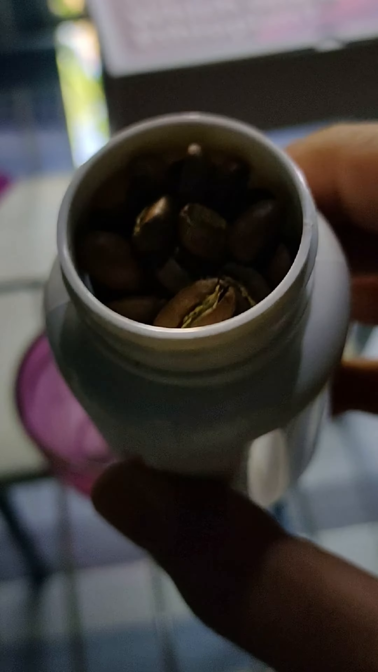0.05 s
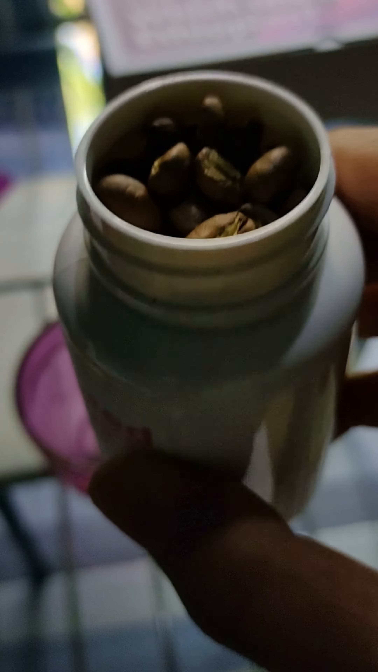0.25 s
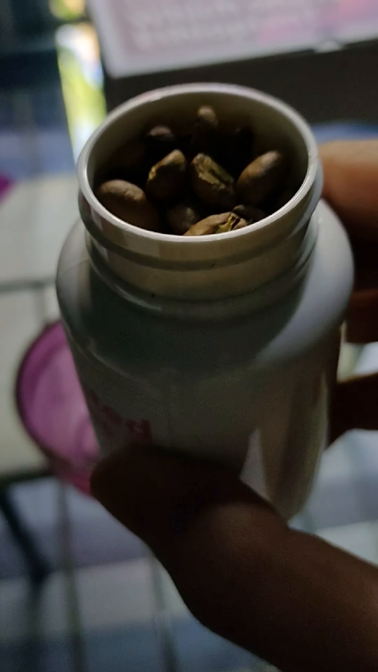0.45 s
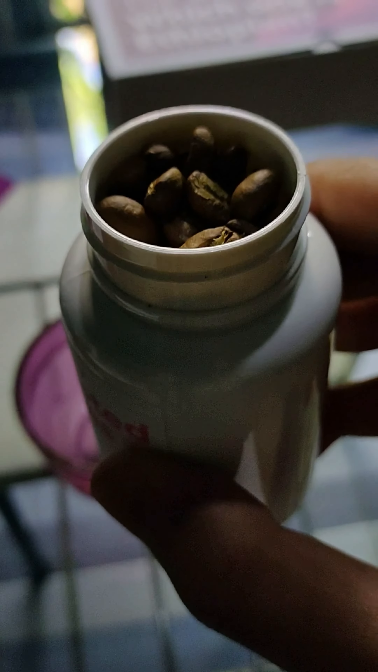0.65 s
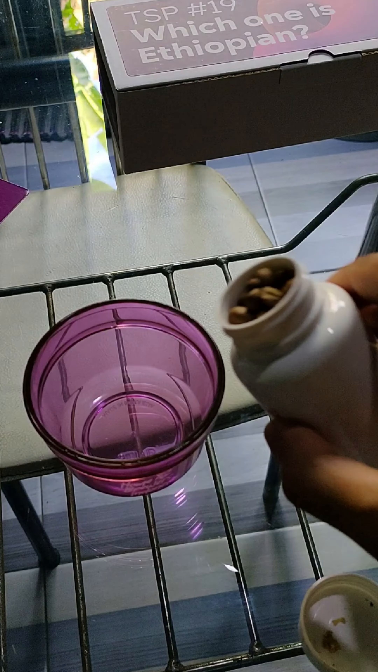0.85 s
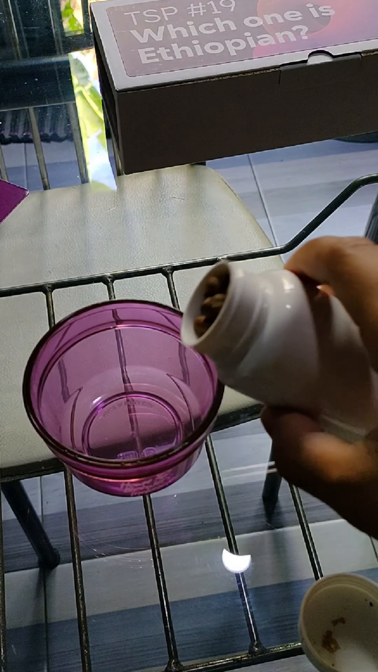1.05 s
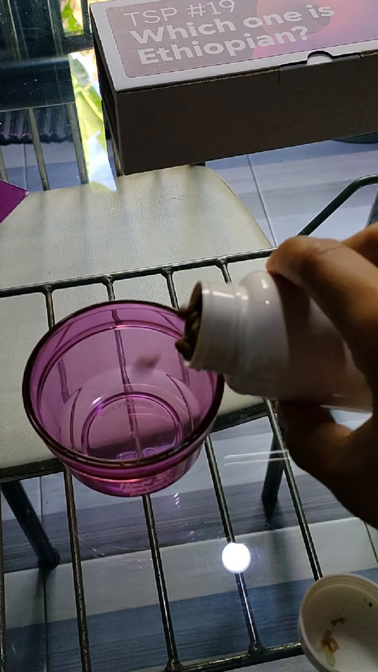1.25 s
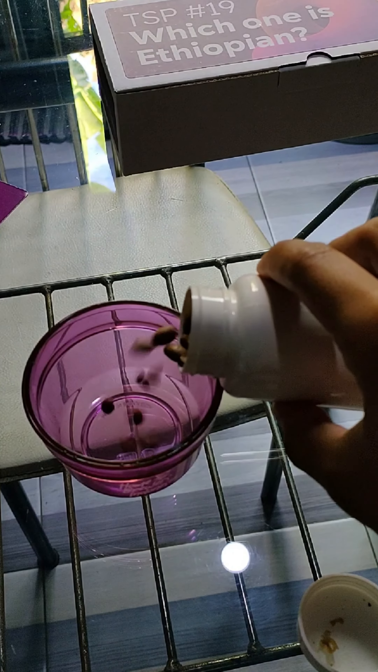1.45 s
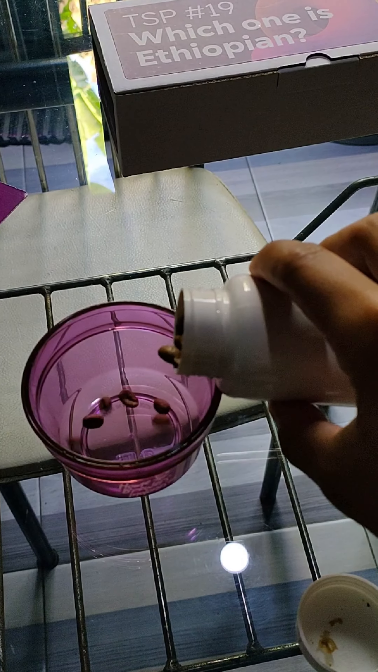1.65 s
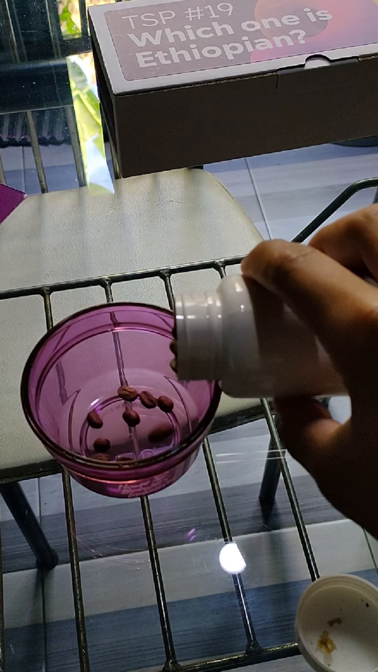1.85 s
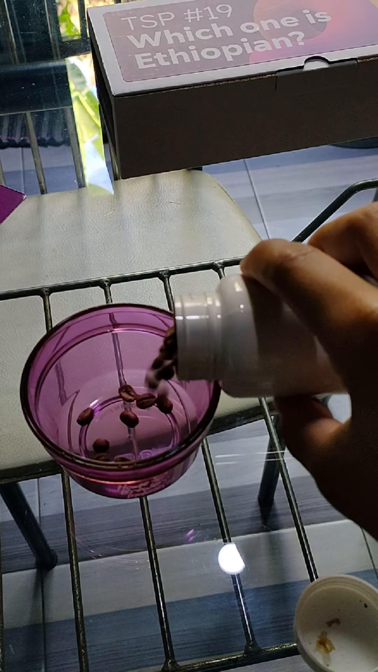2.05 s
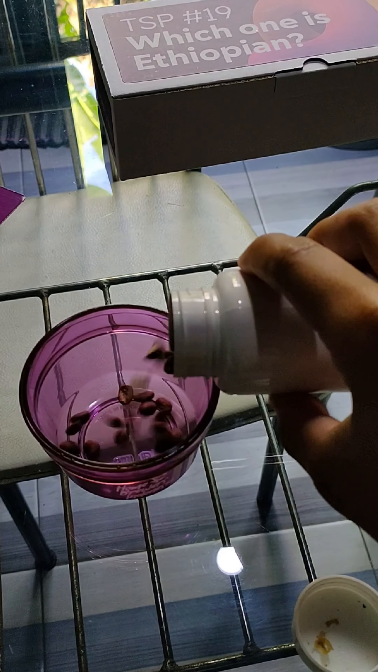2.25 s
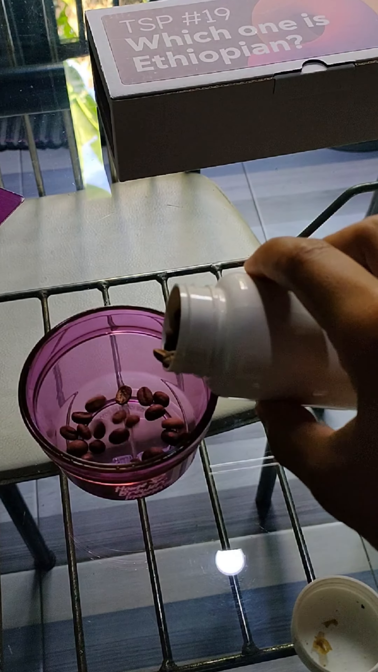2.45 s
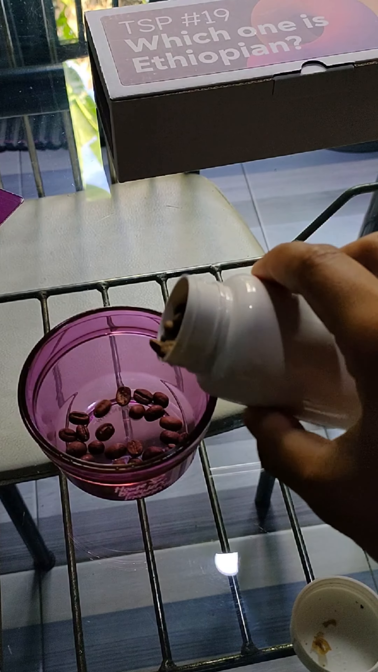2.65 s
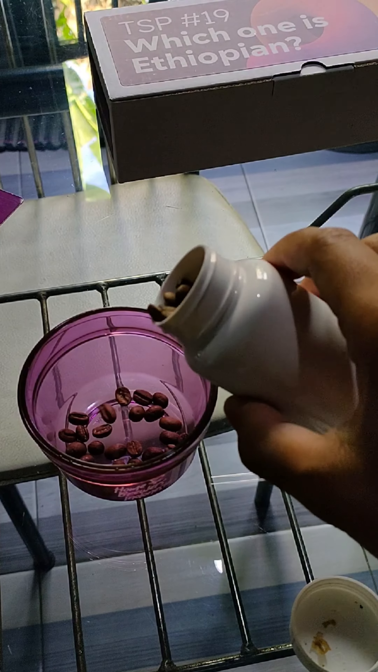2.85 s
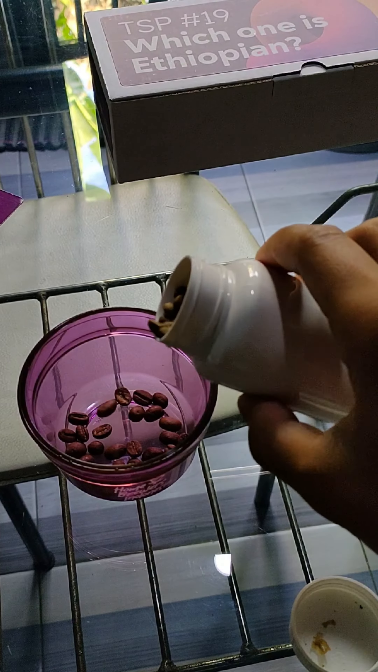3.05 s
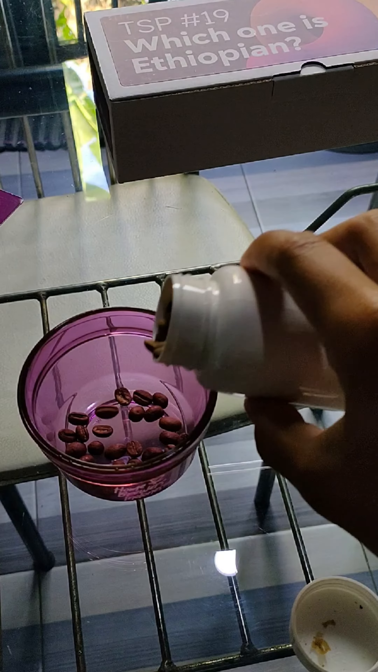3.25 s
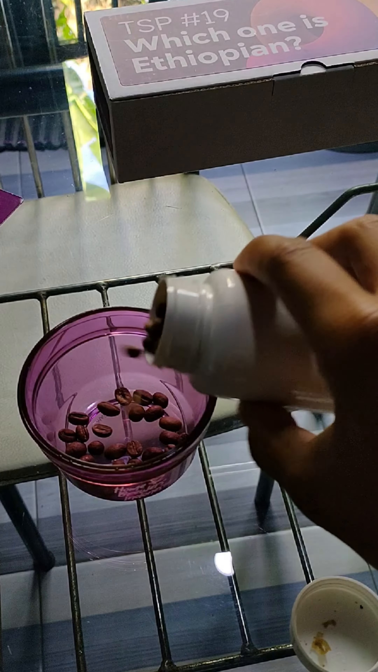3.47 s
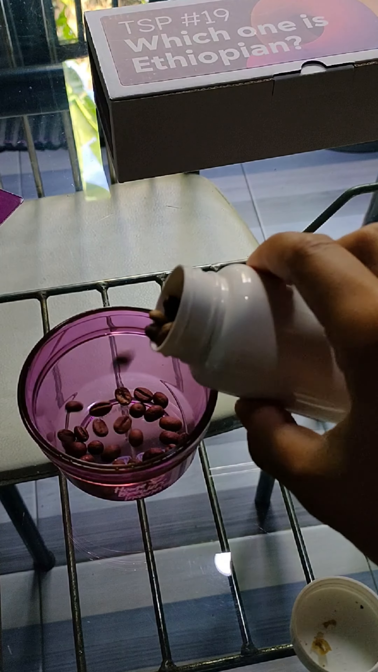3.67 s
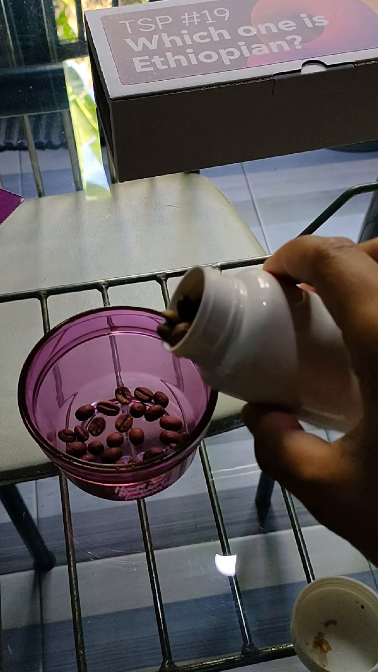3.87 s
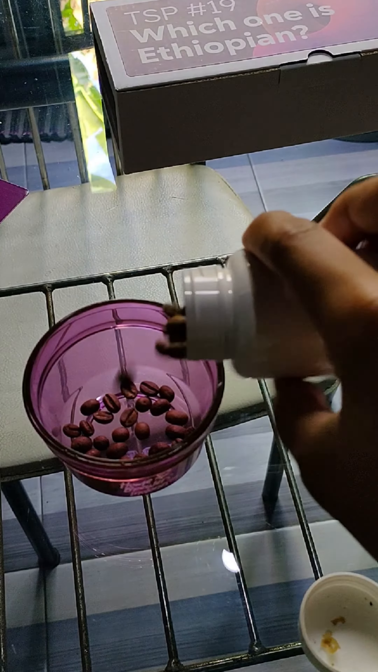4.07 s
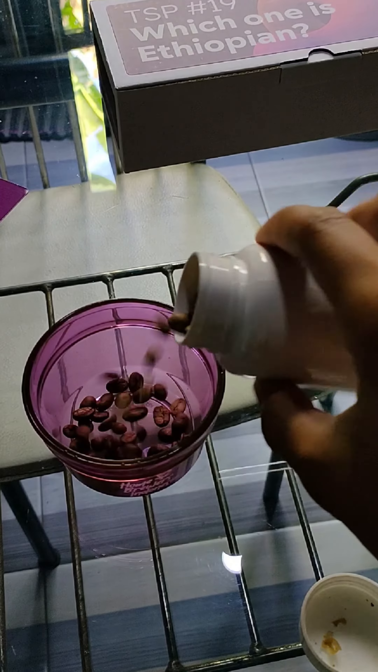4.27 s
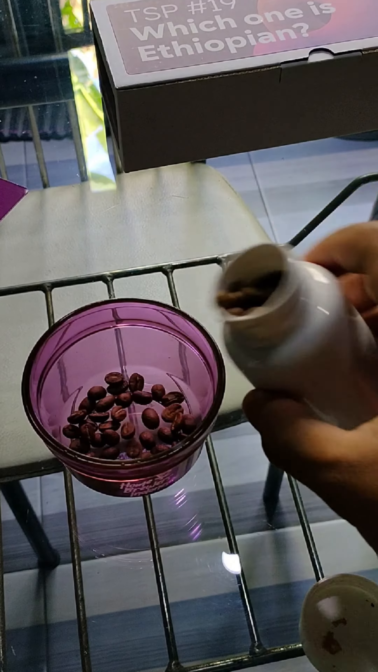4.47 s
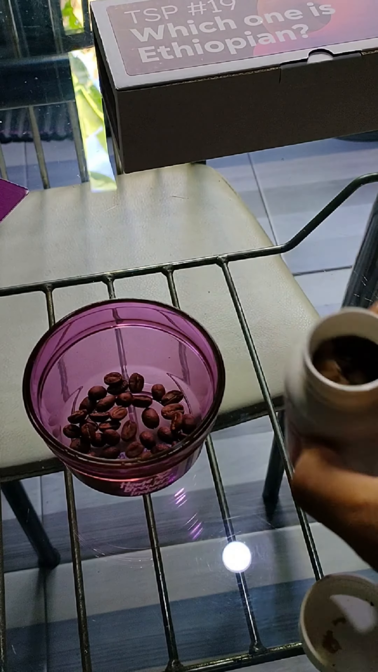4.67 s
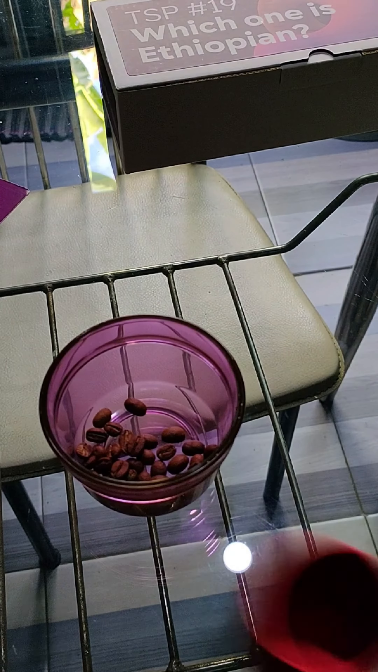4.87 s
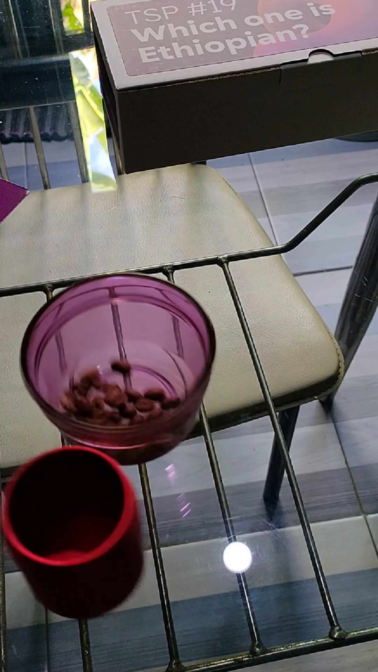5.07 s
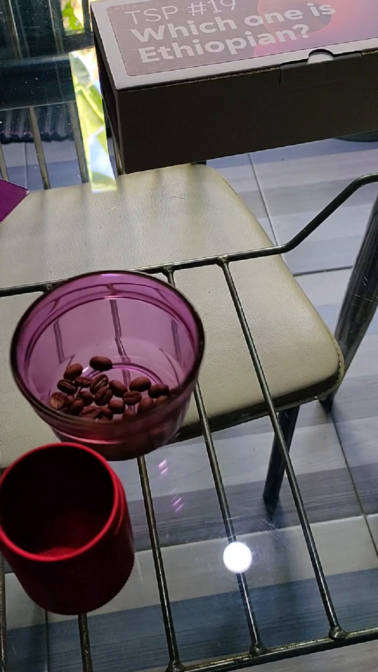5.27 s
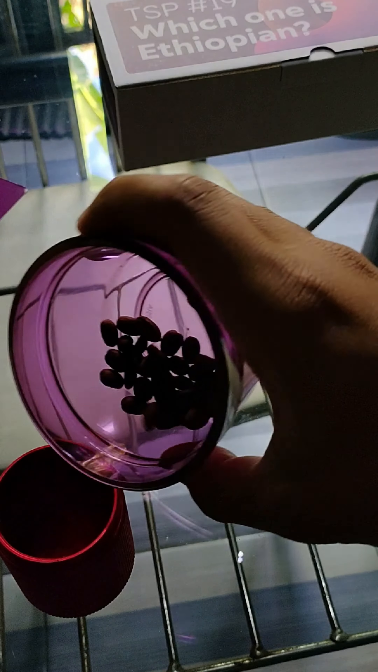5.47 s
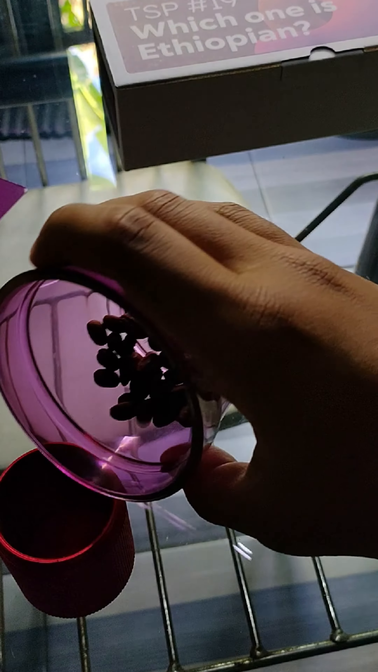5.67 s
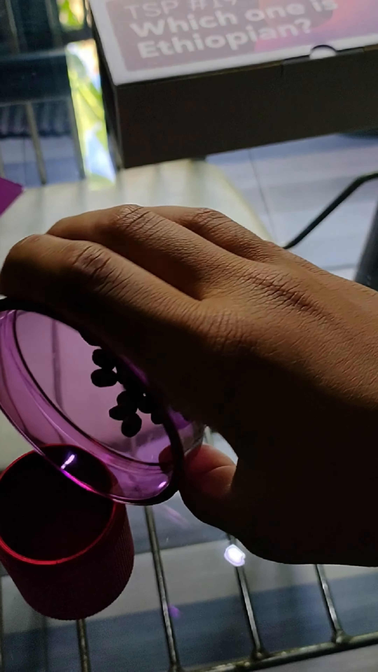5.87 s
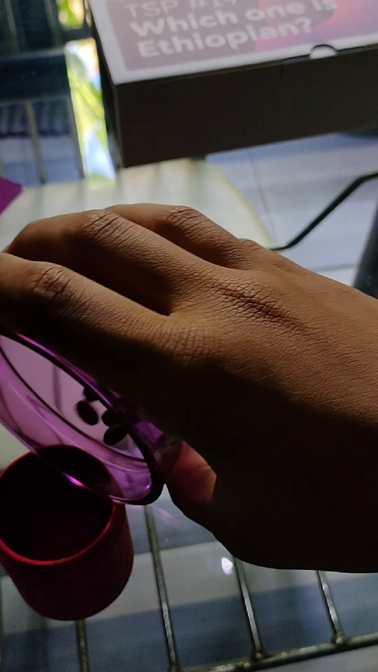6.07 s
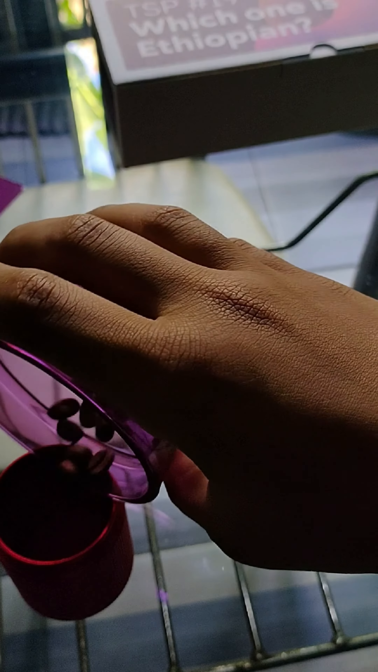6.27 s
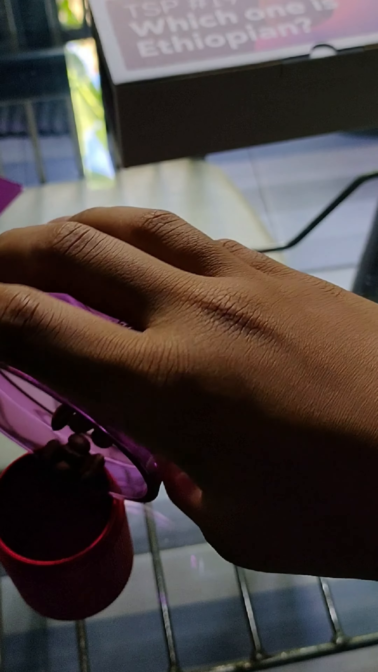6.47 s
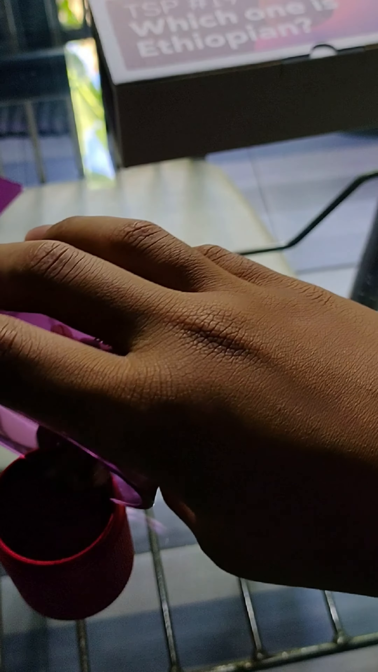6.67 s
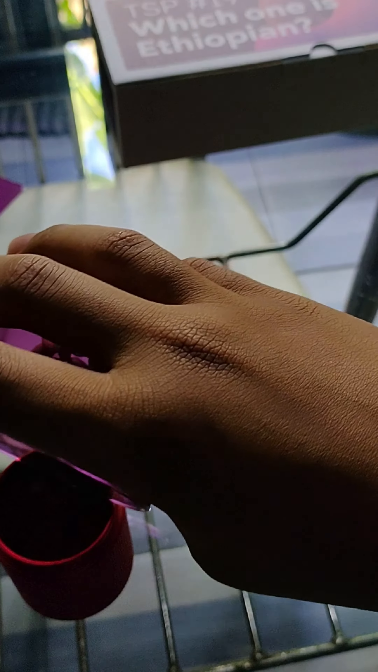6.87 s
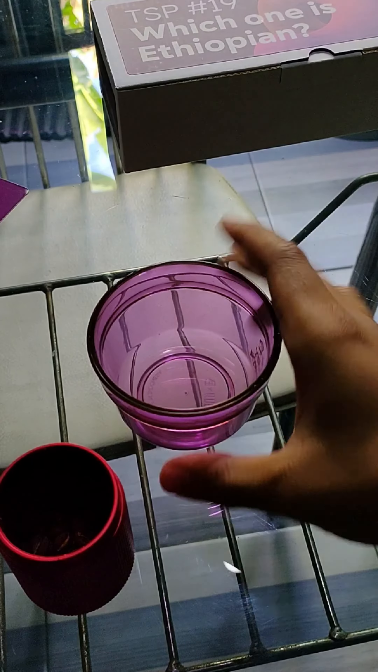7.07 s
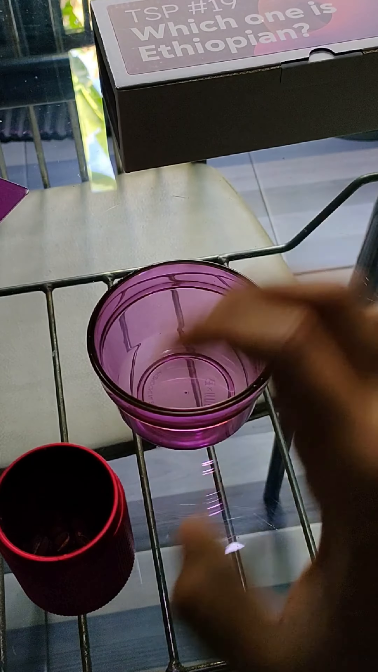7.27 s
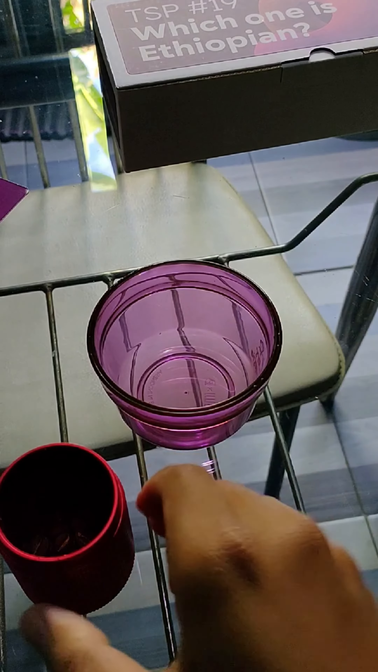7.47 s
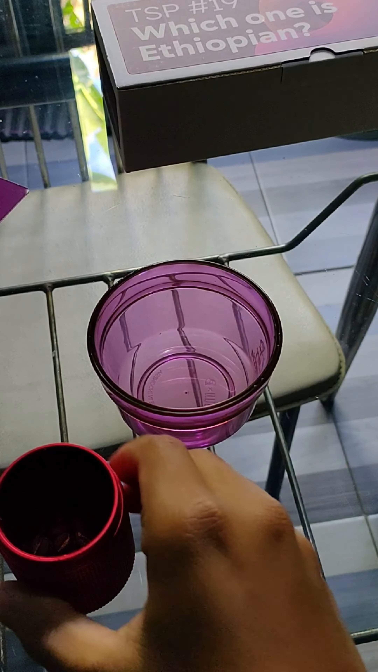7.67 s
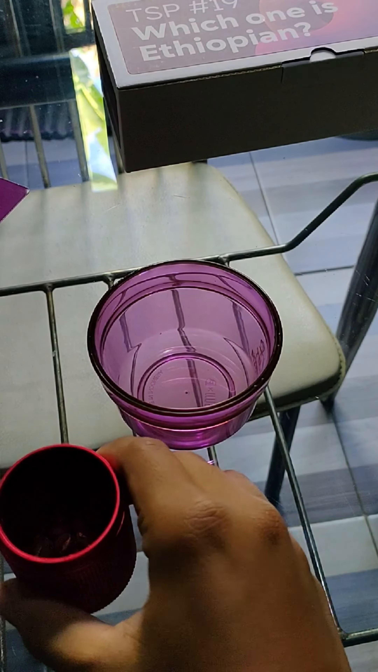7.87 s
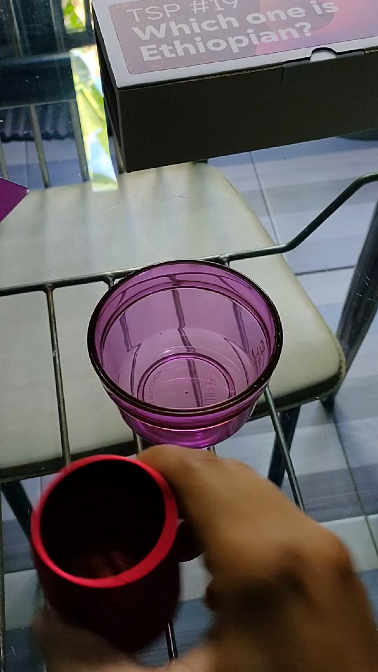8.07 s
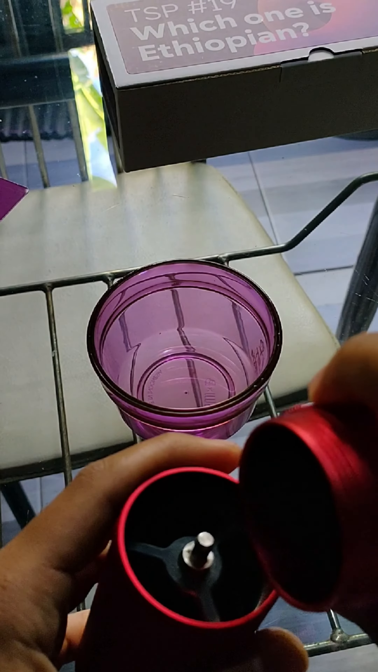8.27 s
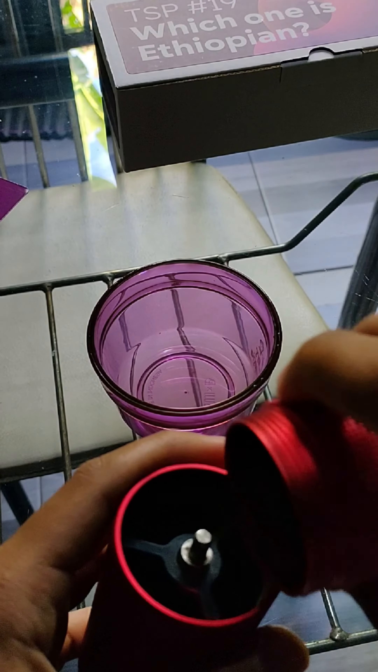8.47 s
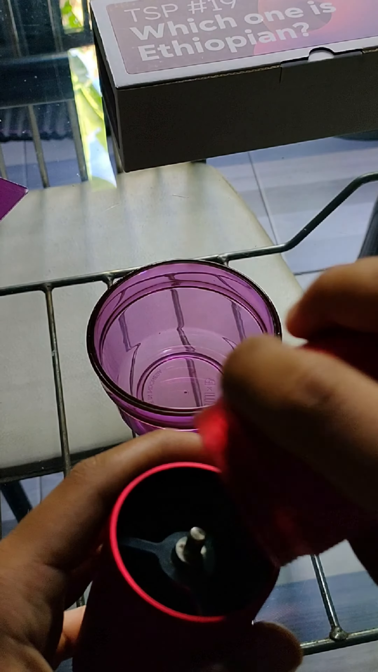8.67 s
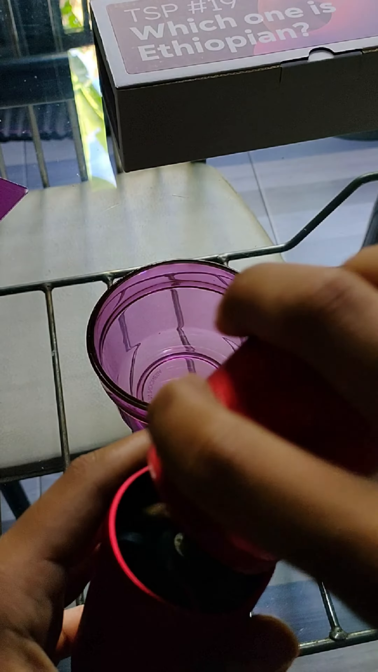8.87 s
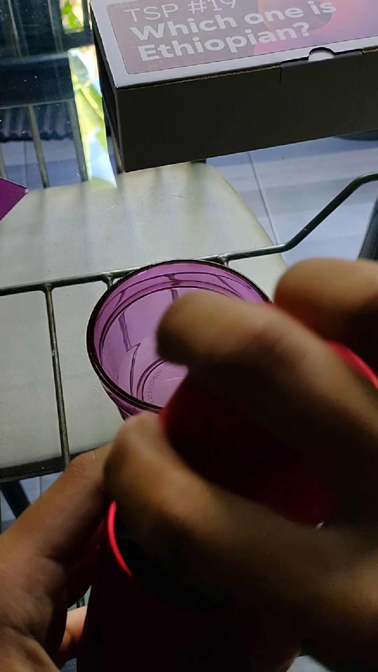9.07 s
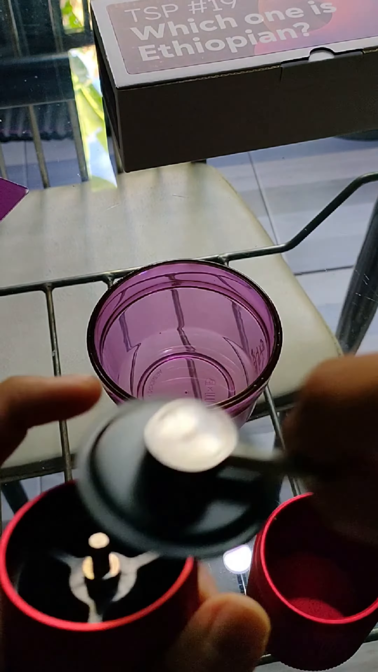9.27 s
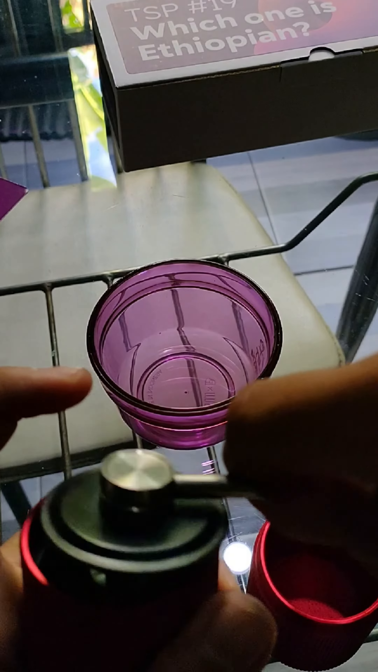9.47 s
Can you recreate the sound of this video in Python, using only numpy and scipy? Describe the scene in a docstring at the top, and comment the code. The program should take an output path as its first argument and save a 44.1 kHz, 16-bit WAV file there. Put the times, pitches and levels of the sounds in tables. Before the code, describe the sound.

Short pours of coffee beans clatter into plastic, a metal cup clanks on a wire rack, and softer pours follow.

```python
"""Coffee beans drop from a bottle into a plastic bowl on a wire rack, then slide into a metal cup
and a hand grinder. Each bean snaps and rings the vessel it hits, over the patter of the rest.
Vessels knock, clink and scrape on the rack, among faint rustles and ticks. Outside, a vehicle drones
past over street hum and hiss. The ringing and room tail break off abruptly four times, and the top
treble is missing."""
import sys
import numpy as np
from scipy import signal
from scipy.io import wavfile
from scipy.ndimage import uniform_filter1d

SR = 44100
rng = np.random.default_rng(int(sys.argv[2]) if len(sys.argv) > 2 else 0)


def dump(signal):
    """Clip the signal to [-1, 1] and save it as 16-bit WAV at the path in sys.argv[1]."""
    limited = np.clip(np.atleast_2d(signal).T, -1, 1)
    pcm = np.round(limited * 32767).astype(np.int16)
    wavfile.write(sys.argv[1], SR, pcm)


N = 419832

# start, the moments where ringing and room tail break off, and end: t/s
BREAKS = [0, 3.908, 4.775, 5.473, 6.938, 9.52]
# modes of the rack's wires: f/Hz, level/dB, t60/s
RACK_MODES = [(170, -12, 0.056), (242, -10, 0.068), (336, -14, 0.054), (407, -3.5, 0.039),
              (570, -8.5, 0.058), (703, -2, 0.035), (938, -1.5, 0.033), (1016, -6.5, 0.059),
              (1330, -2.5, 0.056), (1500, 2, 0.023), (1715, -3, 0.054), (1835, -5, 0.054)]


def beans_in_bowl():
    """Beans rattle into the plastic bowl, whose pitch creeps up as the heap stiffens its floor."""
    hits = [(1.3419, -20.5, 1, -5), (1.3918, -29, -2.5, -1), (1.4571, -32.5, -5, -8.5), (1.47, -36, 9, 9),
            (1.479, -23.5, -4, -4), (1.4909, -27.5, 5, -1), (1.511, -27.5, -7, -12), (1.5269, -29, -3, -4),
            (1.5517, -26, -12, -6.5), (1.5726, -38, -4, 6), (1.5949, -26, -6.5, -10),
            (1.6261, -36.5, -11, -9), (1.6667, -49, 3, 5), (1.7057, -40, -13.5, -12), (1.727, -47, -3, -13),
            (1.7487, -45, -8, -16), (1.8076, -45, -5, -4.5), (1.8793, -26, -1.5, -1.5),
            (1.9275, -37.5, -6.5, -3), (1.9649, -41, -7, -2), (2.014, -41.5, -5, -6.5),
            (2.1317, -29, -5, -4), (2.145, -27, 4, 0.5), (2.176, -29.5, -6.5, -9), (2.1887, -30, 2, -4),
            (2.2128, -25.5, -13.5, -9), (2.2422, -37, 7, -1), (2.2518, -29, 5, 0.5), (2.2634, -39, 9, -1),
            (2.2747, -26.5, 3.5, 0.5), (2.2903, -29, 3, -3), (2.3078, -19.5, -7, -11.5),
            (2.3351, -30, 8, 0), (2.346, -34, 6, -1), (2.3598, -28, -7, -6), (2.3765, -23, -6, -3),
            (2.3924, -30.5, -3, -12), (2.4137, -44, 0, -12), (2.4469, -26, -11, -16), (2.4686, -33, 3, 3),
            (2.4774, -33, 3, 4), (2.502, -47, 5, -0.5), (2.5192, -38, 2, -7), (2.5464, -36.5, 0.5, -5.5),
            (2.5598, -35, -7.5, -10), (2.574, -44, -4, -4.5), (2.5962, -40.5, -2, -9),
            (2.6067, -46, -2, -5), (2.6313, -44.5, -4.5, -6), (2.6443, -44.5, -7, -10),
            (3.5594, -28.5, -0.5, -7.5), (3.5947, -40, 3, -1.5), (3.642, -41, -5, -4),
            (3.6473, -29, -6.5, 1.5), (3.68, -41.5, -5, 10), (3.73, -48, -5, 12),
            (3.7648, -31.5, -10, -0.5), (3.7903, -41, -7, -6), (3.8454, -44.5, 1, 3),
            (3.8541, -36.5, -5, -8), (3.8653, -45, -14, -10), (3.8886, -45, -13, -10),
            (4.146, -33, 8.5, 11), (4.1824, -32.5, -4, -0.5), (4.1999, -33.5, 6, 7),
            (4.2243, -30, -1.5, -7), (4.2374, -45, 8, -5), (4.2619, -44, -5.5, -5), (4.2842, -35, 2.5, 3),
            (4.3176, -33, -0.5, -1), (4.3286, -29, 0.5, -4), (4.3634, -36.5, 3, 1), (4.375, -30.5, -4, -8),
            (4.3925, -40, -2, -7), (4.4014, -36, -3.5, -3), (4.4104, -43, -6, -15), (4.4197, -40.5, 4, 1),
            (4.4636, -41.5, 3, -12), (4.7092, -51, -10, 9)]  # loudest landings: t/s, level/dB, low modes/dB, high modes/dB
    modes = [(1322, -19.5, 0.024), (1556, -18, 0.024), (1809, -22, 0.093), (2241, -7.5, 0.12),
             (2378, -3.5, 0.034), (3220, -1.5, 0.13), (3312, -3.5, 0.11), (3400, 3.5, 0.015),
             (3970, -1.5, 0.016), (4250, -5, 0.018), (4566, -3.5, 0.047), (4932, -8.5, 0.038),
             (4900, 2.5, 0.023), (5617, 5.5, 0.01), (6000, -1, 0.036), (6456, -14.5, 0.028),
             (7046, -21, 0.012)]  # ring of the plastic: f/Hz, level/dB, t60/s
    pours = [
        [(1.36, -66), (1.5, -44.5), (1.62, -46.5), (1.8, -56.5), (2.1, -65), (2.25, -51), (2.45, -42.5),
         (2.67, -59), (2.9, -75.5)],
        [(3.57, -64), (3.75, -54.5), (3.905, -60)],
        [(4.16, -60), (4.21, -41.5), (4.33, -47.5), (4.42, -47), (4.5, -58.5), (4.72, -72)],
    ]  # patter envelopes, one a pour: t/s, level/dB
    loading = [(1.3, 0.999), (4.502, 1.0286)]  # stiffening under the heap: t/s, pitch factor
    return beans(hits, modes, pours, low_hz=2700, high_hz=4200, hold_s=0.007,
                 per_s=700, spread_db=1.5, patter_db=(-4, 3), loading=loading)


def beans_in_cup():
    """Beans slide into the metal cup with sparse, bright ticks."""
    hits = [(5.4759, -36, -14, -4.5), (5.5079, -42.5, -5, -8), (5.5474, -52, 5.5, 4),
            (5.6562, -42, -15, -6), (5.679, -37.5, -20, -7), (5.7074, -43, -19, -6.5),
            (5.7313, -43.5, -8, -8), (5.9237, -42, -10, -11), (5.9492, -37.5, -6, 2),
            (5.9765, -51.5, 0, -6), (5.993, -41.5, -5.5, 4.5), (6.0061, -48.5, -9, -11),
            (6.0713, -42, -8, -16), (6.101, -44, -7, 0), (6.113, -42, -12, 3), (6.137, -43.5, -13, 3),
            (6.146, -46, -12, 0), (6.1558, -46.5, -11, 3), (6.162, -46, -14, 4), (6.1832, -39, -17, -8),
            (6.1996, -42, -9, -8.5), (6.2158, -40.5, -15, -10), (6.2566, -46.5, -11, 1.5),
            (6.3015, -47, -10, 3), (6.3094, -39.5, -11, -2), (6.335, -43, -10, 7), (6.3998, -51, -4, 9),
            (6.4812, -51.5, -8, 1), (6.617, -54, -22, 4), (6.6348, -49, -11, 5), (6.7222, -43.5, -1, 4),
            (6.7302, -45, -5, 4), (6.7744, -51, -4, 11), (6.783, -46.5, 0, 8), (6.8363, -46, 0, 4),
            (6.8545, -49, -8, 8), (6.9008, -49, -6, -4)]  # single landings: t/s, level/dB, low modes/dB, high modes/dB
    modes = [(1940, -4.5, 0.006), (3380, -17.5, 0.073), (3967, -3, .02), (4300, -6, 0.0067),
             (4540, 1, 0.031), (4703, 3, 0.012), (5820, -7.5, 0.019), (6490, -18, 0.014),
             (7100, -25.5, 0.024)]  # ring of the metal: f/Hz, level/dB, t60/s
    pours = [
        [(5.48, -70), (5.6, -71.5), (5.9, -72), (6.08, -54), (6.25, -57), (6.42, -72), (6.6, -63.5),
         (6.8, -55.5), (6.935, -75)],
    ]  # patter envelope: t/s, level/dB
    return beans(hits, modes, pours, low_hz=4000, high_hz=5200, hold_s=0.011,
                 per_s=240, spread_db=-1.6, patter_db=(-5, 3))


def beans_in_grinder():
    """Beans rush into the grinder in one dense, dry patter."""
    hits = [(8.6991, -60, -12, 0), (8.7306, -57, 1, 1), (8.7562, -53.5, 0, 7), (8.7863, -51, -1, 4),
            (8.8123, -50, -7, 7), (8.827, -48, -3, 7), (8.8448, -49, -3, 12), (8.858, -47.5, -7, 2),
            (8.875, -56, -8, 0), (8.887, -46.5, -4, 11), (8.921, -55, 1, 7), (8.9518, -51, 1, 0),
            (8.9726, -51.5, 1, 15), (8.994, -56, 11, 13), (9.0144, -49, 0, 20), (9.0316, -57, -3, 7),
            (9.0564, -69, 0, 6), (9.0947, -51, -7, 8), (9.1294, -55, -16, 4), (9.1494, -64, -11, 4),
            (9.2366, -62.5, 3, 1)]  # single landings: t/s, level/dB, low modes/dB, high modes/dB
    modes = [(1416, -3, 0.0078), (2297, 7, 0.008), (3286, 18, 0.0039), (3717, 3.5, 0.018),
             (4000, 7.5, 0.0072), (4700, -1.5, 0.012), (5500, -5.5, 0.022), (6015, -1.5, 0.0082),
             (6580, -5.5, 0.013), (7070, -19.5, 0.022)]  # ring of the grinder: f/Hz, level/dB, t60/s
    pours = [
        [(8.68, -79), (8.8, -65), (8.96, -57), (9.06, -58.5), (9.16, -69), (9.27, -90)],
    ]  # patter envelope: t/s, level/dB
    return beans(hits, modes, pours, low_hz=2800, high_hz=4200, hold_s=0.012,
                 per_s=1500, spread_db=3.0, patter_db=(-6, 4))


def beans(hits, modes, pours, low_hz, high_hz, hold_s, per_s, spread_db, patter_db,
          loading=((0, 1), (10, 1))):
    """Single beans strike a vessel over the patter; where one lands weights the low and high modes."""
    snap_db, snap_t60_s = -11.5, 0.0072  # the dry crack of the bean itself
    out, t = np.zeros(N), np.arange(1024) / SR
    hz = np.array(modes)[:, :1]
    low, high = hz < low_hz, hz > high_hz
    for s, db, low_db, high_db in hits:
        snap = amp(db + snap_db - 60 * t / snap_t60_s) * (1 - np.exp(-t / 0.0015))
        add(out, s, snap * band_noise(len(t), 2600, 7000))
        pitch = np.interp(s, *np.transpose(loading))
        ring = struck(modes, low_db * low + high_db * high, pitch, scatter_db=4.0, hold_s=hold_s)
        add(out, s, amp(db) * ring)
    patter = tumble(modes, per_s, spread_db, patter_db[0] * low + patter_db[1] * high, hold_s)
    return out + patter * sum(amp(along(pour, 1)) for pour in pours)


def struck(modes, colour_db=0, pitch=1, scatter_db=2, hold_s=1, detune=0.012, size=4096):
    """One blow: where it lands sets each mode's strength, sign and tuning."""
    hz, db, t60 = np.transpose(modes)[:, :, None]
    t = np.arange(size) / SR
    tuning, spot, strength = rng.standard_normal((3, len(modes), 1))
    sign = np.sign(np.sin(hz / 300 + 3 * spot[0]))  # close modes start together, then beat apart
    waves = sign * np.sin(2 * np.pi * hz * pitch * (1 + detune * tuning) * t)
    ring = (amp(db + colour_db + scatter_db * strength - 60 * t / t60) * waves).sum(0)
    ring *= 1 - np.exp(-(t / 0.00082) ** 2)  # the contact takes about a millisecond
    ring *= amp(-12.0 * (1 - np.exp(-(t / hold_s) ** 4)))  # drops to a faint tail after the hold
    return ring / np.sqrt(2 * np.mean(ring[:SR // 200] ** 2))  # amplitude 1 over the first 5 ms


def tumble(modes, per_s, spread_db, colour_db=0, hold_s=1):
    """Small blows of uneven strength land at random on 16 spots, each with its own ring; rms 1."""
    strength = amp(spread_db * np.minimum(rng.exponential(1, N), 4))
    blows = strength * (rng.random(N) < per_s / SR)
    out, spots = np.zeros(N), rng.integers(0, 16, N)
    for spot in range(16):
        ring = struck(modes, colour_db, scatter_db=6.0, hold_s=hold_s, detune=0.02, size=2048)
        out += signal.oaconvolve(blows * (spots == spot), ring)[:N]
    return unit_rms(out)


def rack_knocks():
    """A vessel knocks the rack: the wires ring and thud under a clack and a bright tick."""
    knocks = [(4.741, -47, 9, -6, -6.5), (4.943, -37.5, -7.5, -2, 11), (4.963, -50, -25.5, -22.5, -12),
              (4.999, -58.5, 14, 4.5, 24.5), (5.167, -51.5, 13, 8, -14), (5.236, -47.5, -0.5, -5, 4.5),
              (5.326, -55.5, -2, 2, 4), (5.365, -54.5, 16, -7, 3), (5.856, -49, -12.5, -6, -1.5),
              (6.345, -65.5, -18, 1, 14.5), (6.401, -62.5, -10.5, 1.5, 5), (6.585, -63.5, 2, -28, -17),
              (6.772, -54.5, -22, -5, 3), (6.939, -60, -1, -19, 4), (8.468, -66, -24, 4, 3.5),
              (8.523, -61, -11, 9, 20), (8.621, -60, -16, -9, 11.5), (9.451, -63.5, -19, 12, 18)]  # t/s, level/dB, then relative to it: thud/dB, clack/dB, tick/dB
    clack_t60_s = 0.021
    out, t = np.zeros(N), np.arange(16384) / SR
    low = np.array(RACK_MODES)[:, :1] < 800
    for s, db, thud_db, clack_db, tick_db in knocks:
        wires = struck(RACK_MODES, thud_db * low, scatter_db=4.0, size=len(t))
        clack = amp(clack_db) * band_noise(len(t), 730, 3900)
        tick = amp(tick_db) * band_noise(len(t), 2070, 4480)
        add(out, s, amp(db) * (wires + (clack + tick) * amp(-60 * t / clack_t60_s)))
    return out


def metal_rings():
    """Knocked, the cup's wall and the grinder's lid give a short loud ring over a long faint one."""
    wall_modes = [(4530, 2, 0.049), (4840, -16.5, 0.13), (2280, -5.5, 0.025), (4420, -26.5, 0.92),
                  (2310, -27.5, 0.27)]  # cup wall: f/Hz, level/dB, t60/s
    lid_modes = [(3470, 5, 0.021), (2220, -12, .012), (1210, -3.5, 0.015), (2584, -14.5, .9)]  # grinder lid: f/Hz, level/dB, t60/s
    wall_blows = [(4.948, -27, -21), (4.96, -25.5, -23), (8.469, -56, 4), (8.5225, -35.5, 1.5)]  # knocks on the cup: t/s, level/dB, low modes/dB
    lid_blows = [(9.452, -43, 2)]  # knock on the lid: t/s, level/dB, low modes/dB
    out, t = np.zeros(N), np.arange(16384) / SR
    attack = 1 - np.exp(-t / 0.0016)
    for modes, blows in ((wall_modes, wall_blows), (lid_modes, lid_blows)):
        for s, db, low_db in blows:
            ring = sum(amp(mode_db + low_db * (hz < 2400) - 60 * t / t60) * np.sin(2 * np.pi * hz * t)
                       for hz, mode_db, t60 in modes)
            add(out, s, amp(db) * ring * attack)
    return out


def rack_scrapes():
    """A vessel is set down or nudged: quick slips buzz its foot and the wires, then die away."""
    scrapes = [(4.944, -39.5, -11, 0.56), (5.158, -53, -14, 0.23), (5.236, -51.5, -5.5, 0.31),
               (5.32, -57, -6.5, 1.24), (5.86, -70.5, -2, 0.46), (6.345, -69.5, -2, 0.59),
               (6.59, -64.5, -6.5, 1.9), (6.775, -71, -10, 0.93), (6.938, -58, -4.5, .45)]  # t/s, level/dB, wires against foot/dB, t60/s
    foot_modes = [(2900, -27, 0.011), (3433, -5, 0.014), (3700, 1, 0.0039), (4500, 11, 0.0025),
                  (5650, 2.5, 0.0026), (6040, -13, 0.0063)]  # ring of the foot: f/Hz, level/dB, t60/s
    foot = tumble(foot_modes, per_s=1100, spread_db=1.9)
    wires = tumble(RACK_MODES, per_s=700, spread_db=3.5)
    out, t = np.zeros(N), np.arange(SR) / SR
    for s, db, wires_db, t60 in scrapes:
        slips = (foot + amp(wires_db) * wires)[round(s * SR):][:SR]
        add(out, s, amp(db - 60 * t / t60) * slips)
    return out


def rustles_and_clinks():
    """Faint rustles and ticks, plus brief noisy ringing of the bowl and metal cup."""
    swells = [(.44, 0.048, 0.058, 2300, 404, -67), (0.858, 0.0087, 0.081, 4300, 2420, -68.5),
              (1.2, 0.0013, 0.0056, 4500, 4000, -64.5), (1.224, 0.0057, 0.0083, 4500, 3000, -62.5),
              (1.309, 0.0026, 0.011, 4880, 3047, -68), (4.048, 0.001, 0.017, 4900, 4000, -66),
              (4.071, 0.045, 0.12, 1100, 149, -73.5), (4.095, 0.0046, 0.02, 4500, 4000, -57.5),
              (6.959, 0.0037, 0.077, 3590, 704, -57), (8.621, 0.047, 0.18, 4560, 164, -60),
              (7.02, 0.022, 0.049, 570, 300, -75), (7.328, .07, .7, 1320, 144, -80.5),
              (7.741, 0.052, 0.058, 3000, 800, -72), (7.97, 0.015, .06, 4000, 1500, -71),
              (8.42, 0.021, 0.16, 2170, 279, -71.5), (9.401, 0.046, 0.13, 4500, 1220, -71)]  # swells of band noise: peak t/s, rise/s, fall/s, f/Hz, width/Hz, level/dB
    out = np.zeros(N)
    for s, rise, fall, hz, width, db in swells:
        t = np.arange(30000) / SR - 2 * rise
        swell = np.where(t < 0, np.exp(-(t / rise) ** 2), np.exp(-abs(t) / fall))
        add(out, s + t[0], amp(db) * swell * band_noise(len(t), hz - width / 2, hz + width / 2))
    return out


def vehicle():
    """Firing orders fall in pitch as it passes; reflections make each waver over the exhaust roar."""
    pass_by = [(.85, -70.5, 7), (1.1, -60.5, -19.5), (1.4, -62, -11.5), (1.8, -60.5, -10.5), (2.1, -52, -7),
               (2.7, -58.5, 2.5), (3.1, -63.5, 0), (3.5, -61.5, -7), (3.905, -63.5, 0)]  # engine envelope: t/s, level/dB, lowest three orders/dB
    orders = [(1, -28), (2, -12.5), (3, 0.5), (4, -15.5), (5, -5), (6, -2.5), (7, -15), (8, -23),
              (9, -14.5), (10, -16.5), (11, -12.5), (12, -23)]  # engine tones: multiple of the firing rate, level/dB
    start_hz, sag_hz_per_s, roar_db = 43.56, 1.5, -12
    firing_hz = start_hz - sag_hz_per_s * (np.arange(N) / SR - pass_by[0][0])
    cycles = np.cumsum(firing_hz) / SR
    tones, low_db = np.zeros(N), along(pass_by, 2, outside=0)
    for order, db in orders:
        level = amp(db + low_db * (order < 4) + 2.0 * wander(3.5) + 2.3 * wander(25.0))
        phase = order * (cycles + 0.0096 * wander(13.0)) + rng.random()
        tones += level * np.sin(2 * np.pi * phase)
    roar = amp(roar_db) * band_noise(N, 160, 650)
    return amp(along(pass_by, 1)) * (unit_rms(tones) + roar)


def far_hums():
    """Distant low tones fade in, waver and fade out."""
    hums = [(0, 0.86, 89, -69.5), (0, 0.927, 178, -75), (3, 3.9, 55, -76), (3.92, 4.753, 53, -68),
            (7, 8.08, 70, -75), (7, 8.089, 174, -78), (8.15, 9.103, 60, -73)]  # start t/s, end t/s, f/Hz, level/dB
    out = np.zeros(N)
    for start, end, hz, db in hums:
        t = np.arange(0, end - start, 1 / SR)
        swell = amp(db + wander(17.0)[:len(t)]) * signal.windows.tukey(len(t), 0.3)
        phase = hz * t + 0.03 * wander(13.0)[:len(t)]
        add(out, start, np.sqrt(2) * swell * np.sin(2 * np.pi * phase))
    return out


def street():
    """A bed of patchy hiss whose low end swells with the traffic."""
    spectrum = [(24, -35.5), (40, -1), (90, -2), (149, -7.5), (177, -5), (202, -8), (399, -14.5),
                (604, -21), (1270, -19), (1660, -20), (2350, -19), (2920, -19), (4530, -15.5), (7500, -41),
                (9750, -84), (16500, -120)]  # colour of the street and room hiss: f/Hz, level/dB
    envelope = [(0, -66.5, -0.5), (2.002, -66.5, 2), (3.299, -67.5, 3.5), (3.899, -66.5, 4),
                (3.918, -64.5, -0.5), (4.769, -65, -6.5), (4.779, -65.5, -3.5), (5.471, -66, -7.5),
                (6.93, -64, -12), (7.601, -67.5, -6.5), (8.3, -67.5, -7.5), (9.52, -68, -8)]  # drifts and sudden steps: t/s, level/dB, rumble below 600 Hz/dB
    frames, hz = N // 256 + 5, np.fft.rfftfreq(1024, 1 / SR)
    real, imag, patches = rng.standard_normal((frames, 513, 3)).T
    patches = unit_rms(uniform_filter1d(uniform_filter1d(patches, 10, 0), 16, 1))
    f, db = np.transpose(spectrum)
    colour = amp(np.interp(np.log(hz + 1), np.log(f + 1), db))[:, None]
    s, _, rumble_db = np.transpose(envelope)
    low_db = np.interp(np.arange(frames) * 256 / SR, s, rumble_db) / (1 + (hz[:, None] / 600) ** 4)
    bins = (real + 1j * imag) * colour * amp(low_db + 1.5 * patches)
    hiss = signal.istft(bins, nperseg=1024, noverlap=768)[1][:N]
    return amp(along(envelope, 1)) * unit_rms(hiss)


def room(x):
    """Sparse echoes die away band by band; the tail stops dead at each break."""
    decay = [(500, 0.93), (2000, 0.68), (4000, 0.3), (7000, 0.51)]  # reverb time: f/Hz, t60/s
    echoes = np.zeros(SR)
    at = np.arange(400, SR - 20, 20) + rng.integers(0, 20, (SR - 401) // 20)
    echoes[at] = rng.choice([-1., 1.], at.shape)
    hz, t, bins = signal.stft(echoes, SR, nperseg=256)
    t60 = np.interp(hz, *np.transpose(decay))[:, None]
    tail = signal.istft(bins * amp(-60 * t / t60), SR, nperseg=256)[1]
    tail /= np.linalg.norm(tail)
    edges = [round(s * SR) for s in BREAKS]
    return np.concatenate([signal.fftconvolve(x[a:b], tail)[:b - a] for a, b in zip(edges, edges[1:])])


def amp(db):
    return 10 ** (np.asarray(db) / 20)


def unit_rms(x):
    return x / np.sqrt(np.mean(x ** 2) + 1e-20)


def along(rows, column, outside=-150):
    """A table column as an envelope over every sample."""
    rows = np.array(rows)
    return np.interp(np.arange(N) / SR, rows[:, 0], rows[:, column], outside, outside)


def add(mix, s, sound):
    """Lays a sound in at s seconds, chopped at the next break."""
    end = min(edge for edge in BREAKS if edge > s)
    part = mix[round(s * SR):round(end * SR)][:len(sound)]
    part += sound[:len(part)]


def band_noise(size, low_hz, high_hz):
    """Noise in a band, rms 1."""
    band = signal.butter(3, (low_hz, high_hz), "band", fs=SR, output="sos")
    return unit_rms(signal.sosfilt(band, rng.standard_normal(size)))


def wander(rate_hz):
    """Random drift no faster than rate_hz, rms 1."""
    t = np.arange(0, N + 256, 256) / SR
    rates = np.geomspace(rate_hz / 12, rate_hz, 16)
    drift = sum(np.sin(2 * np.pi * (hz * t + rng.random())) / np.sqrt(hz) for hz in rates)
    return np.interp(np.arange(N) / SR, t, unit_rms(drift))


def scene():
    """Beans and vessels up close in the room, the street behind them; mono."""
    near = beans_in_bowl() + beans_in_cup() + beans_in_grinder()
    near += rack_knocks() + metal_rings() + rack_scrapes() + rustles_and_clinks()
    return (near + amp(-6.5) * room(near) + vehicle() + far_hums() + street())[None]


def record(dry):
    """A steep treble cut, over a very faint noise floor."""
    treble_edge_hz, hiss_edge_hz = 7550, 15600
    lowpass = signal.firwin(301, treble_edge_hz, window=("kaiser", 9), fs=SR)[None]
    hiss_lowpass = signal.firwin(301, hiss_edge_hz, fs=SR)[None]
    hiss = signal.oaconvolve(rng.standard_normal(dry.shape), hiss_lowpass, "same")
    return signal.oaconvolve(dry, lowpass, "same") + amp(-99) * hiss


dry = scene()
out = record(dry)
dump(out)
```